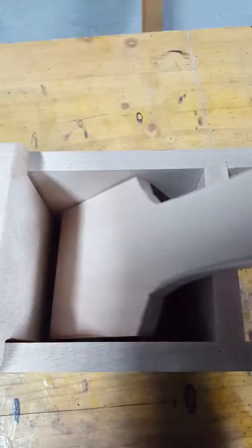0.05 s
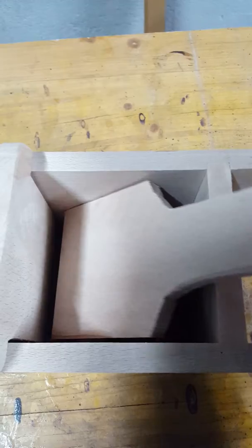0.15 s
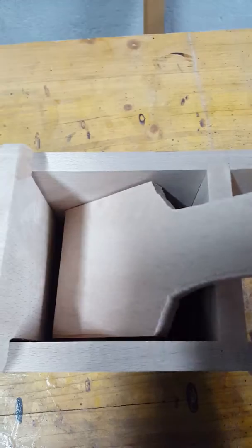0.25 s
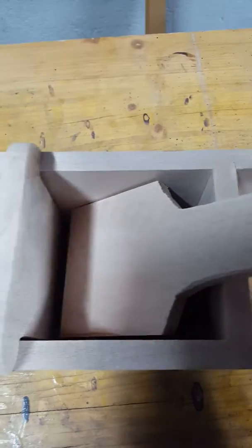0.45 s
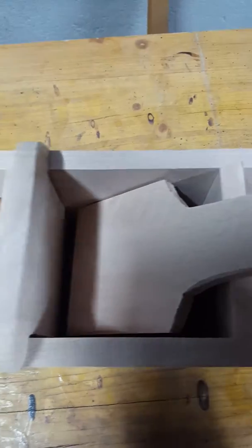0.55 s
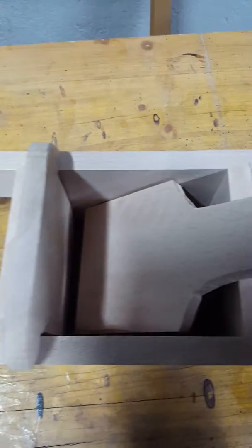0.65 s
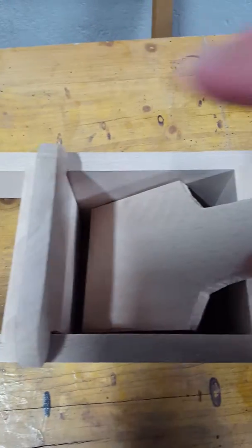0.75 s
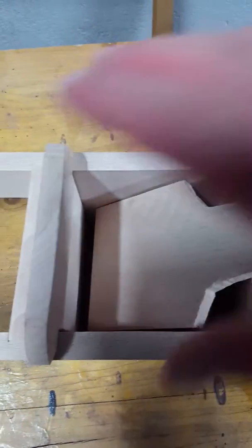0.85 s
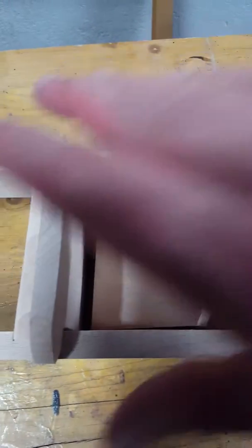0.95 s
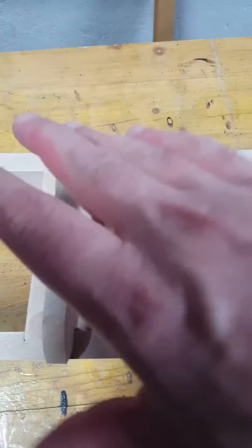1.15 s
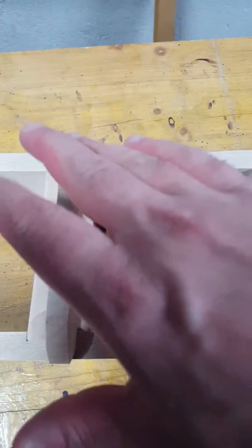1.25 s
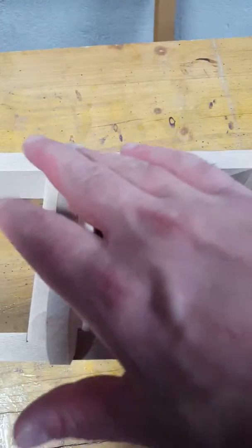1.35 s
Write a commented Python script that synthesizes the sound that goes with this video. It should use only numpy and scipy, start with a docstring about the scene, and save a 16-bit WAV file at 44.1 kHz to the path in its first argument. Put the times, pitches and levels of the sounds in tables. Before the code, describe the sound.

A wooden nutcracker knocks once, close by, its jaw sliding faintly just before it lands. The hollow hit rings briefly through the bench and the small workshop, then fades into faint room noise.

```python
"""A wooden nutcracker on a workbench, close by: its jaw slides softly and lands with one hollow knock.
Wood rubbing on wood makes the slide; the hit makes the frame and the bench ring briefly.
The small workshop answers with low notes and a short echo, and the jaw settles with a tiny tick.
A soft, dull swell follows. Faint room noise lies under it all."""
import sys
import numpy as np
from scipy import signal
from scipy.fft import rfft, irfft
from scipy.io import wavfile

SR = 44100
rng = np.random.default_rng(int(sys.argv[2]) if len(sys.argv) > 2 else 0)


def transcribe(signal):
    """Save signal, clipped to [-1, 1], as a 16-bit WAV file at the path in sys.argv[1]."""
    frames = np.atleast_2d(signal).T
    limited = np.clip(frames, -1, 1)
    pcm = np.round(limited * 32767).astype(np.int16)
    wavfile.write(sys.argv[1], SR, pcm)


N = 61739

KNOCK_S, CONTACT_S = .2322, .0004  # when the jaw lands; how fast a hit builds up
# How alike left and right sound in the room (1 = the same, 0 = unrelated): pitch_hz, likeness
ROOM_LIKENESS = [(100, 0.85), (320, .85), (520, 0.33), (1200, 0.063), (2500, -.1), (12000, -0.14)]


def undb(db):
    """Turn decibels into a number to multiply a sound by."""
    return 10 ** (np.asarray(db) / 20)


def over_hz(points, hz):
    """Read between the rows of a (pitch_hz, value) table, giving each octave equal room."""
    pitches, values = np.array(points, float).T
    return np.interp(np.log(np.maximum(hz, 1)), np.log(pitches), values)


def since(start):
    """Seconds since a moment, zero before it."""
    return np.maximum(np.arange(N) / SR - start, 0)


def fade(age, rise_s, fade_s):
    """Rise, then die away; fade_s is the time it takes to fall by 60 dB."""
    return (1 - np.exp(-age / rise_s)) * np.exp(-np.log(1000) * age / fade_s)


def noise(colour, likeness, peaks=()):
    """Stereo noise of average strength 1; colour and peaks say which pitches stand out."""
    hz = np.fft.rfftfreq(N, 1 / SR)
    boost_db = sum(lift / (1 + (2 * (hz - pitch) / width) ** 2) for pitch, width, lift in peaks)
    strength = undb(over_hz(colour, hz) + boost_db)
    alike = np.clip(over_hz(likeness, hz), -1, 1)
    phases = np.exp(2j * np.pi * rng.random((2, len(hz))))
    shared, opposite = phases * strength * np.sqrt([1 + alike, 1 - alike])
    stereo = irfft([shared + opposite, shared - opposite], N)
    return stereo / stereo.std()


def ring(notes, start, rise_s):
    """Fading pure tones set off together, one stereo sound for each note."""
    age = since(start)
    tones = []
    for hz, db, fade_s, left_db in notes:
        gains = undb([[db + left_db / 2], [db - left_db / 2]])
        tones.append(gains * np.sin(2 * np.pi * hz * age) * fade(age, rise_s, fade_s))
    return np.array(tones)


def wander(rate_hz):
    """A line that drifts to a new random value rate_hz times a second."""
    return np.interp(since(0) * rate_hz, np.arange(N), rng.standard_normal(N))


def slide():
    """Wood rubs unevenly on wood until the jaw lands, then comes to rest."""
    # Tone of the rubbing: pitch_hz, relative_db
    colour = [(30, -26), (100, -19), (220, -0.5), (360, -2), (430, -22), (620, -11.5), (850, -19),
              (1500, -20.5), (2200, -24), (3500, -29.5), (5500, -32.5), (8200, -35.5), (9400, -34.5),
              (15000, -42)]
    # Pitches at which the rubbing makes the wood ring: pitch_hz, width_hz, boost_db
    peaks = [(365, 30, 5), (1190, 80, 16), (1660, 55, 14), (2630, 60, 11), (3580, 130, 8), (4770, 110, 7)]
    # Typical loudness of the rubbing: time_s, level_db
    loudness = [(0, -47), (.06, -51), (.11, -51), (.145, -48.5), (.19, -53), (.225, -55.5), (.5, -60),
                (.7, -73)]
    level_db = np.interp(since(0), *np.array(loudness).T, right=-np.inf)
    roughness_db = 1.5 * wander(rate_hz=83.33)
    return undb(level_db + roughness_db) * noise(colour, ROOM_LIKENESS, peaks)


def background():
    """Faint hiss, a low wavering drone and a thin whine."""
    # Tone of the hiss: pitch_hz, relative_db
    colour = [(20, -7), (50, -6), (80, 1.5), (110, -9), (270, -5.5), (480, -11.5), (1050, -18),
              (3500, -21.5), (6500, -28.5), (11000, -29.5), (15500, -25)]
    drone_hz, whine_hz = 81, 10890
    t = since(0)
    drone = undb(-77 + 2 * wander(rate_hz=5)) * np.sin(2 * np.pi * drone_hz * t)
    whine = undb(-95) * np.sin(2 * np.pi * whine_hz * t)
    hiss = undb(-66.5) * noise(colour, ROOM_LIKENESS)
    return hiss + drone + whine


def knock():
    """The jaw hits the frame: frame and bench ring, and the wooden faces crack together."""
    # Ringing notes of frame and bench: pitch_hz, level_db, fade_s, left_minus_right_db
    wood_notes = [(238, -14, .05, 2), (306, -9.5, 0.16, 0.5), (491, -13.5, 0.073, -4.5),
                  (853.4, -23, 0.03, 2.5), (999.4, -19.5, .036, 4.5), (1253, -14.5, 0.034, 1.5),
                  (1550, -28.5, .035, 3), (1690, -30, .17, 4), (2090, -38, .045, -5.5),
                  (2892, -34.5, .03, -9), (4290, -46, .035, -5), (5520, -60, 0.051, 3),
                  (6700, -61, 0.034, -1)]
    # Tone of the dry crack: pitch_hz, relative_db
    crack_colour = [(60, -42), (300, -17), (900, 3.5), (1600, -1.5), (2100, -8.5), (3100, -3),
                    (3800, -27.5), (4400, -22), (5300, -37.5), (7000, -39.5), (8500, -44.5), (9700, -40.5),
                    (15000, -55.5)]
    tones = ring(wood_notes, KNOCK_S, CONTACT_S)
    # Neighbouring notes swing opposite ways and give off little bass.
    body = sum((-1) ** k * tone for k, tone in enumerate(tones))
    bass_cut = signal.butter(1, 100, "high", fs=SR, output="sos")
    crack_level = undb(-16) * fade(since(.2338), CONTACT_S, fade_s=.015)
    crack = crack_level * noise(crack_colour, likeness=[(1, -.25)])
    return signal.sosfilt(bass_cut, body) + crack


def workshop():
    """The room answers the knock: its air rings, and a smooth echo fades, treble first."""
    # Notes of the room (close pairs throb): pitch_hz, level_db, fade_s, left_minus_right_db
    room_notes = [(81.2, -40.5, .6, -0.5), (82.5, -46, 1.2, -0.5), (139.4, -42, .41, 0.5),
                  (206.7, -35.5, 0.63, -0.5), (247.6, -28.5, 0.78, -1.5), (298.36, -19, 0.51, 0),
                  (313.8, -22, 0.76, -0.5), (370, -25, .22, -0.5), (439.3, -33.5, 0.35, 0.5),
                  (490.3, -40, .68, 3.5), (556.6, -21.5, .33, -5), (573.3, -38, 0.66, 3.5),
                  (679, -34.5, .44, 0), (1213, -40, .45, 2), (1283, -42.5, 0.47, 1.5), (1656, -42, .42, 2)]
    # Tone of the echo: pitch_hz, relative_db
    echo_colour = [(30, -29.5), (130, -9), (200, -2.5), (300, -0.5), (540, 1), (630, -10), (740, -4.5),
                   (820, -11), (1250, -6.5), (1700, -17), (1850, -22.5), (3000, -23.5), (3600, -46),
                   (4500, -36.5), (6000, -49), (15000, -55.5)]
    # How long each band of the echo lasts: pitch_hz, fade_s
    echo_fades = [(100, 1), (300, 0.89), (700, .6), (1100, 0.55), (1700, 0.53), (3000, 0.57), (8000, 0.12)]
    delay_s, left_lag_s = .0053, .00024
    start = KNOCK_S + delay_s
    hz = np.fft.rfftfreq(N, 1 / SR)
    spectrum = rfft(noise(echo_colour, ROOM_LIKENESS))
    echo = 0
    for centre, fade_s in echo_fades:
        band = over_hz([(pitch, pitch == centre) for pitch, _ in echo_fades], hz)
        echo = echo + irfft(spectrum * band, N) * fade(since(start), CONTACT_S, fade_s)
    tones = ring(room_notes, start + np.array([[left_lag_s], [0]]), rise_s=.0016)
    return undb(-31) * echo + tones.sum(axis=0)


def settle():
    """A tiny dry tick as the jaw settles."""
    # Tone of the tick: pitch_hz, relative_db
    colour = [(500, -12), (2000, -2.5), (2650, 2), (3500, -13), (7500, -18), (15000, -25)]
    return undb(-61) * fade(since(.4035), CONTACT_S, fade_s=.1) * noise(colour, ROOM_LIKENESS)


def swell():
    """A soft, dull swell of noise as a hand moves."""
    # Tone of the swell: pitch_hz, relative_db
    colour = [(40, -20), (65, -4), (82, 13), (105, -24), (190, -17), (248, 9), (280, -5), (320, -0.5),
              (400, -7.5), (600, -12.5), (3000, -60)]
    return undb(-54) * fade(since(.943), rise_s=.088, fade_s=.64) * noise(colour, ROOM_LIKENESS)


def scene():
    """Add the nutcracker, the room and the quiet sounds around them."""
    return slide() + knock() + settle() + workshop() + swell() + background()


def record(dry):
    """A steep filter takes away the very highest treble."""
    top_hz = 15750
    return signal.sosfilt(signal.ellip(10, .2, 80, top_hz, fs=SR, output="sos"), dry)


dry = scene()
out = record(dry)
transcribe(out)
```